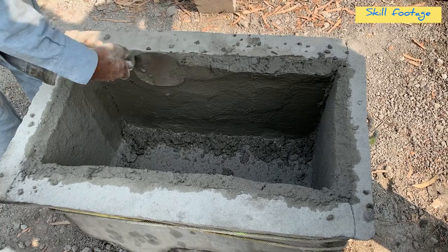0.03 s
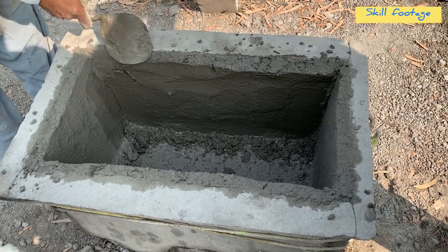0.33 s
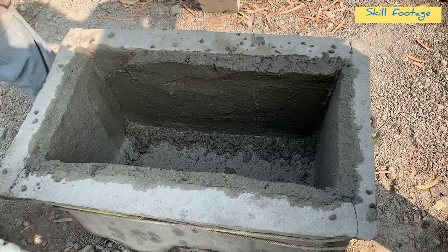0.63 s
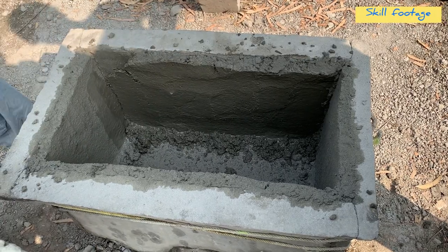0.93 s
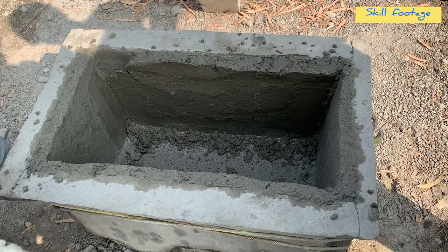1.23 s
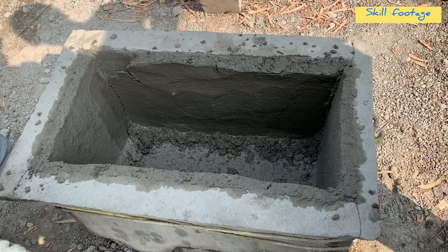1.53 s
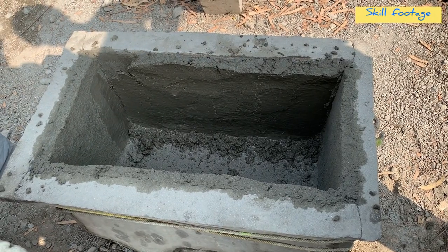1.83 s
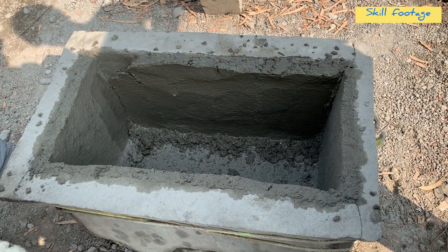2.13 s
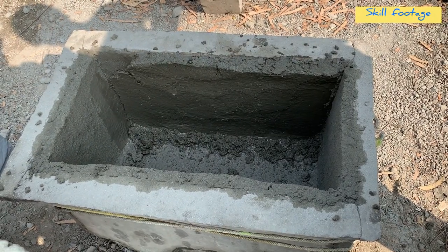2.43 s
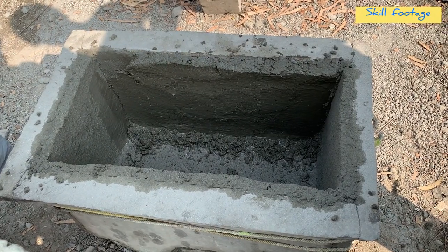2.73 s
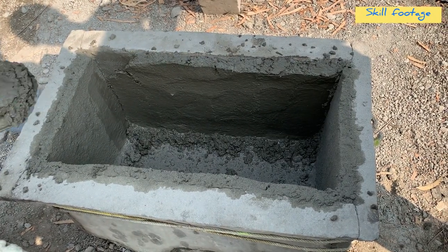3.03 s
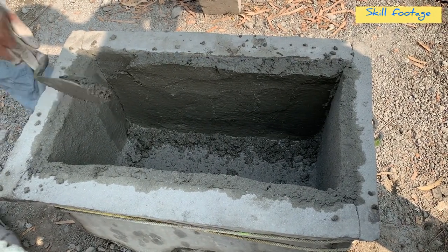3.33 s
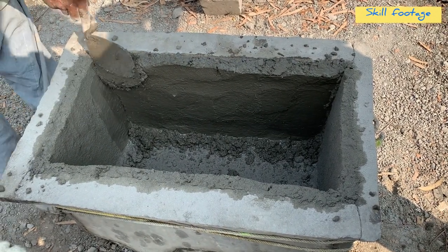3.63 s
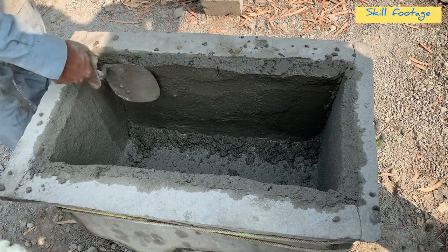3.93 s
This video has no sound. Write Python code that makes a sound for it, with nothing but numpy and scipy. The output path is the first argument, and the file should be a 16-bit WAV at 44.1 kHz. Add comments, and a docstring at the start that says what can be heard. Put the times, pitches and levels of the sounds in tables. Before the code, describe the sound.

Close up outdoors, a trowel works gritty mortar: a hissing stroke and a tap ahead, four hollow scoops to the left, then a wet slap and more smoothing. A sleeve rustles faintly and a far-off engine hums.

```python
"""Outdoors at a concrete pit, on a close pair of microphones; a distant engine hums under the air.
Straight ahead, a steel trowel hisses over the pit's wet lining, then taps the rim. A sleeve rustles.
Off to the left the blade digs four times into sandy mortar, a hollow resonating under it; the grains'
treble arrives slightly earlier on the right. The loaded blade lifts with a faint swish.
Ahead again, the load slaps onto the pit wall and is smoothed out."""
import sys
import numpy as np
from scipy import signal
from scipy.fft import rfft, irfft, next_fast_len
from scipy.io import wavfile
from scipy.ndimage import uniform_filter1d, map_coordinates

SR = 44100
rng = np.random.default_rng(int(sys.argv[2]) if len(sys.argv) > 2 else 0)


def to_wav(s):
    """Save 16-bit WAV."""
    ch = np.atleast_2d(s).T  # columns
    pcm = np.round(np.clip(ch, -1, 1) * 32767)  # PCM
    wavfile.write(sys.argv[1], SR, pcm.astype(np.int16))


N = 176400
TIME = np.arange(N) / SR


def amp(db):
    """Decibels to gain."""
    return 10 ** (np.asarray(db) / 20)


def unit(x):
    """Scale to rms 1."""
    return x / np.sqrt(np.mean(x ** 2) + 1e-20)


def along(points, hz):
    """Read (frequency [Hz], value) points on a log axis."""
    freqs, values = np.transpose(points)
    return np.interp(np.log(hz + 1), np.log(freqs + 1), values)


def stroke(rows):
    """Gain of one stroke, silent outside it."""
    times, db = np.transpose(rows)[:2]
    return amp(np.interp(TIME, times, db, left=-140, right=-140))


def wobble(rate):
    """A smooth random curve at rms 1, rate knots a second."""
    knots = rng.standard_normal(int(N * rate / SR) + 4)
    return unit(map_coordinates(knots, [TIME * rate]))


def filtered(x, response):
    """x times a complex response of frequency."""
    size = next_fast_len(N + SR // 2)
    return irfft(rfft(x, size) * response(np.fft.rfftfreq(size, 1 / SR)), size)[..., :N]


def coloured(x, spectrum):
    """x shaped by a spectrum, at rms 1."""
    return unit(filtered(x, lambda hz: amp(along(spectrum, hz))))


def burst(at, rise, fall):
    """Exponential swell to a peak, then exponential decay; all times in seconds."""
    return np.exp(np.minimum((TIME - at) / rise, (at - TIME) / fall))


def ring(at, hz, rise, fall):
    """One damped mode, struck softly."""
    return burst(at, rise, fall) * np.sin(2 * np.pi * hz * (TIME - at) + rng.uniform(0, 2 * np.pi))


def patchy(x, depth_db):
    """Random patches of colour that shift over time and frequency."""
    spectra = signal.stft(x, nperseg=512)[2]
    patches = uniform_filter1d(rng.standard_normal(spectra.shape[-2:]), size=3, axis=0)
    patches = uniform_filter1d(patches, size=6, axis=1)
    return signal.istft(spectra * amp(depth_db * unit(patches)), nperseg=512)[1][..., :N]


def sand(spectrum, per_s, size_spread_db, hiss, patchy_db):
    """Dense clicks of sand grains of uneven size over a fine hiss."""
    hits = rng.random(N) < per_s / SR
    grains = hits * rng.standard_normal(N) * amp(size_spread_db * rng.standard_normal(N))
    return coloured(patchy(unit(grains) + hiss * rng.standard_normal(N), patchy_db), spectrum)


def resonance(hz, width_hz):
    """Friction noise in one resonance, its centre steady or moving."""
    phase = 2 * np.pi * np.cumsum(np.broadcast_to(hz, N)) / SR
    a, b = filtered(rng.standard_normal((2, N)), lambda f: 1 / (1 + 1j * f / width_hz) ** 2)
    return unit(a * np.cos(phase) + b * np.sin(phase))


# reflections off the nearby concrete (frequency [Hz], level [dB])
REFLECTIONS = [(150, 2.5), (1000, -19), (2200, -5), (4500, 3), (8000, -22.5), (15000, -57)]
REFLECTION_DELAY_S, LEFT_LAG_S = .003, .000216


def placed(x, phase, balance):
    """A source at the two microphones, with diffuse reflections off the concrete."""
    def direct_path(hz):
        sides = np.array([[.5], [-.5]])
        left_lead = along(phase, hz) - 2 * np.pi * hz * LEFT_LAG_S
        return amp(along(balance, hz) * sides) * np.exp(1j * left_lead * sides)

    def reflected_path(hz):
        return amp(along(REFLECTIONS, hz)) * np.exp(-2j * np.pi * hz * REFLECTION_DELAY_S)

    spectra = signal.stft(x, nperseg=256)[2]
    random_phase = np.exp(2j * np.pi * rng.random((2, *spectra.shape)))
    diffuse = signal.istft(spectra * random_phase, nperseg=256)[1][:, :N]
    return filtered(x, direct_path) + np.sqrt(2) * filtered(diffuse, reflected_path)


# the wall at the microphones (frequency [Hz], left lead on top of the lag [rad])
WALL_PHASE = [(100, 0), (1100, 0.018), (2000, 1.38), (3300, 1.21), (5000, 1.1), (7000, .05), (15000, 0.087)]
# its balance (frequency [Hz], left minus right [dB])
WALL_BALANCE = [(200, 0), (1000, 10.5), (3000, -1), (8000, 0)]


def at_wall(x):
    """The pit wall lies ahead of the microphones."""
    return placed(x, WALL_PHASE, WALL_BALANCE)


# blade sliding on the wall, one curve per stroke (time [s], relative level [dB])
WALL_STROKES = [
    [(0.0, -41), (0.012, -48), (0.076, -41), (0.148, -43), (0.196, -50), (0.236, -77), (0.29, -92)],
    [(3.5, -54), (3.516, -64), (3.552, -46.5), (3.59, -52), (3.67, -34.5), (3.72, -68), (3.76, -78.5)],
    [(3.93, -93), (3.932, -91), (3.992, -42.5), (4.0, -50)],
]
# colour of each stroke (singing [dB], treble tilt [dB per octave])
STROKE_COLOURS = [(-3, -1), (-14, 3.5), (-14, -3)]
# grit in the wet lining (frequency [Hz], level [dB])
WALL_GRIT = [(150, -28.5), (600, -18), (2000, -7), (3300, -10), (4300, -7), (5500, -7), (7000, 0.5),
             (8600, 0.5), (10000, -1), (12000, 1), (14000, -4.5), (15500, -9.5)]
BLADE_HZ, BLADE_WIDTH_HZ = 8550, 320


def smoothing():
    """Pressed flat, the blade hisses over the wet lining and sings faintly."""
    grit = sand(WALL_GRIT, per_s=5000, size_spread_db=1.5, hiss=0.97, patchy_db=2)
    song = resonance(BLADE_HZ, BLADE_WIDTH_HZ)
    out = np.zeros(N)
    for rows, (sing_db, tilt_db) in zip(WALL_STROKES, STROKE_COLOURS):
        hiss = unit(filtered(grit, lambda hz: amp(tilt_db * np.log2(np.maximum(hz / BLADE_HZ, .5)))))
        out += stroke(rows) * unit(hiss + amp(sing_db) * song)
    return amp(3.5 + .6 * wobble(90)) * out


# open air around the pit (frequency [Hz], relative level [dB])
AIR_SPECTRUM = [(20, -11.5), (45, 3), (62, 5), (78, 7), (100, -2), (150, -7.5), (205, -7.5), (300, -18.5),
                (450, -19.5), (1000, -20.5), (2000, -29), (4000, -38.5), (7000, -50.5), (10000, -53),
                (15500, -67)]
# likeness of the air at the two microphones (frequency [Hz], correlation [-1 to 1])
AIR_LIKENESS = [(30, -0.059), (65, 0.32), (130, 0.93), (250, 0.31), (550, -0.02), (1650, -0.23),
                (5000, 0.22), (15000, -0.19)]
AIR_DB = -42


def open_air():
    """Steady air and rumble from all around, partly alike at the two microphones."""
    def mid_side_gains(hz):
        angle = np.arccos(np.clip(along(AIR_LIKENESS, hz), -1, 1)) / 2
        return np.array([np.cos(angle), np.sin(angle)])

    noise = patchy(rng.standard_normal((2, N)), depth_db=1.72)
    mid, side = filtered(noise, mid_side_gains)
    return amp(AIR_DB) * coloured(np.array([mid + side, mid - side]), AIR_SPECTRUM)


# hum arriving from far off (time [s], level [dB])
ENGINE_LEVEL = [(0.0, -35.5), (0.02, -39), (0.92, -41.5), (0.99, -50), (1.48, -34.5), (1.82, -48),
                (1.85, -37), (2.08, -59), (2.1, -42.5), (2.72, -36), (2.87, -45), (3.05, -35.5),
                (3.15, -45), (3.68, -40), (3.73, -55), (4.0, -39)]
ENGINE_HZ = 64.85


def engine():
    """A distant engine: one low tone that wavers in pitch and level."""
    shaft = 2 * np.pi * np.cumsum(ENGINE_HZ + 0.79 * wobble(7.02)) / SR
    level = amp(np.interp(TIME, *np.transpose(ENGINE_LEVEL)))
    microphone_phase = np.array([[-.12], [.12]])
    return level * np.sqrt(2) * np.sin(shaft + microphone_phase)


# blade contacts (time [s], tick level [dB], rise [s], fall [s], thud level [dB])
KNOCKS = [(.372, -33, 0.011, 0.0133, -40.5), (0.647, -60.5, 0.012, 0.016, -64),
          (0.713, -63, 0.0044, 0.013, -55), (.9445, -22, 0.0032, 0.0043, -57),
          (1.274, -44.5, .005, 0.0093, -45.5), (1.888, -27, 0.0053, .012, -44.5)]
# the bright tick (frequency [Hz], level [dB])
TICK_SPECTRUM = [(150, -14), (500, -12), (2500, -24), (5000, -16.5), (7000, 1), (9000, 2), (11500, 0.5),
                 (15500, -7.5)]
# the duller clack (frequency [Hz], level [dB])
CLACK_SPECTRUM = [(150, -4), (500, -6.5), (1000, -6.5), (1800, 7.5), (2800, -8.5), (4200, -5.5),
                  (7000, -32), (15500, -31)]
# dull ring of trowel and concrete (frequency [Hz], level against the thud [dB], fall [s])
RIM_MODES = [(180, 1, 0.022), (499, -9.5, 0.01), (1108, -5.5, 0.031), (2280, -14.5, 0.0102)]


def knocks():
    """The blade meets concrete or a pebble: a gritty tick, a duller clack and a short ring."""
    tick = sand(TICK_SPECTRUM, per_s=4400, size_spread_db=1.5, hiss=1, patchy_db=0)
    clack = sand(CLACK_SPECTRUM, per_s=2500, size_spread_db=3, hiss=.7, patchy_db=4)
    out = np.zeros(N)
    for at, tick_db, rise, fall, thud_db in KNOCKS:
        out += amp(tick_db) * burst(at, rise, fall) * tick
        out += amp(thud_db - 1) * burst(at + 0.0073, rise, fall=0.015) * clack
        out += sum(amp(thud_db + db) * ring(at, hz, rise, decay) for hz, db, decay in RIM_MODES)
    return out


# swings of the arm (time [s], rustle level [dB], width [s], sliding hiss level [dB])
RUSTLES = [(.74, -65, 0.07, -73), (.85, -55.5, 0.047, -66), (2.42, -65.5, .05, -70),
           (3.021, -58, 0.055, -66.5), (3.2, -68, 0.05, -77)]
# rustling cloth (frequency [Hz], level [dB])
CLOTH_SPECTRUM = [(300, -19), (1500, 1), (3000, -1), (4800, 3), (6500, -8.5), (9500, -7.5), (11000, -22.5),
                  (15500, -23)]
SLIDE_HZ = 4740


def sleeve():
    """The sleeve rustles in soft, wide swells, with a narrow hiss in the centre where cloth slides."""
    rustle, slide = np.zeros((2, N))
    for at, rustle_db, width, slide_db in RUSTLES:
        swell = np.exp(-.5 * ((TIME - at) / width) ** 2)
        rustle += amp(rustle_db) * swell
        slide += amp(slide_db) * swell
    cloth = rustle * coloured(rng.standard_normal((2, N)), CLOTH_SPECTRUM)
    hiss = slide * resonance(SLIDE_HZ, width_hz=900)
    return amp(0.76 * wobble(40)) * (cloth + hiss)


# the heap at the microphones (frequency [Hz], left lead on top of the lag [rad])
HEAP_PHASE = [(100, 0.5), (400, 3), (860, 2.5), (1210, 3.5), (1600, 5), (2500, 9), (3800, 13.5),
              (5000, 13.5), (7000, 12.5), (15000, 12.5)]
# its balance (frequency [Hz], left minus right [dB])
HEAP_BALANCE = [(200, 15), (700, 15), (1300, 5), (2400, 6.5), (4400, 6), (8100, -2), (15000, 1)]


def at_heap(x):
    """The heap lies off to the left of the microphones."""
    return placed(x, HEAP_PHASE, HEAP_BALANCE)


# blade in the heap, one curve per push (time [s], relative level [dB])
HEAP_PUSHES = [
    [(0.89, -74), (0.932, -46), (0.944, -38.5), (0.958, -45), (1.0, -34), (1.088, -53.5), (1.144, -43),
     (1.206, -54), (1.23, -65)],
    [(1.23, -65.5), (1.276, -33.5), (1.304, -41.5), (1.354, -47), (1.428, -47), (1.454, -39),
     (1.504, -36.5), (1.54, -57.5)],
    [(1.54, -62), (1.562, -50), (1.676, -57.5), (1.712, -40.5), (1.722, -40), (1.81, -88)],
    [(1.82, -87), (1.884, -33.5), (1.9, -33), (1.914, -44), (1.974, -40), (2.004, -50.5), (2.022, -48),
     (2.09, -74)],
    [(2.09, -74), (2.138, -43), (2.222, -35.5), (2.262, -41.5), (2.33, -38.5), (2.364, -59.5), (2.41, -71)],
    [(2.41, -71), (2.448, -59), (2.478, -61.5), (2.504, -56.5), (2.518, -56.5), (2.566, -82.5), (2.58, -83)],
]
# sandy mortar on steel (frequency [Hz], level [dB])
HEAP_GRIT = [(150, -14), (450, -9), (800, -7.5), (1500, 0.5), (2300, -3.5), (3500, 0), (5000, -3.5),
             (6500, -2.5), (8000, 3), (9300, 5), (11000, 4.5), (13000, -3), (15500, -3)]


def digging():
    """Sand grinds along the blade as it cuts into the heap."""
    force = np.max([stroke(rows) for rows in HEAP_PUSHES], axis=0)
    grit = sand(HEAP_GRIT, per_s=3500, size_spread_db=1, hiss=0.93, patchy_db=3)
    return amp(3.5 + 0.48 * wobble(110)) * force * grit


# hollow under the blade, one curve per dig (time [s], relative level [dB], pitch [Hz])
HOLLOWS = [
    [(.92, -56, 1050), (.945, -43.5, 1037), (.98, -42, 1033), (1.01, -33, 1020), (1.05, -43.5, 995),
     (1.09, -44, 1021), (1.13, -42.5, 1043), (1.21, -55.5, 956)],
    [(1.25, -60, 1150), (1.28, -50, 1100), (1.35, -41, 1020), (1.42, -41.5, 894), (1.47, -40, 817.5),
     (1.505, -38.5, 735), (1.54, -54, 764), (1.565, -48, 756), (1.6, -72, 740)],
    [(1.87, -82, 801), (1.89, -40, 803), (1.92, -52.5, 803), (1.96, -46.5, 776), (2.03, -65.5, 782)],
    [(2.13, -52, 1100), (2.19, -50, 1047), (2.24, -38, 929), (2.285, -33.5, 859), (2.31, -43.5, 934),
     (2.335, -47, 990), (2.36, -62, 1000)],
]
# its resonances (frequency [multiple of pitch], relative width [ratio], level [dB])
HOLLOW_MODES = [(.8, 0.14, -11), (1, 0.11, 1.5), (1.85, .18, -9.5)]
# per dig (factor on those widths [ratio])
HOLLOW_SPREAD = [0.7, 0.62, 2.1, 1.3]
# steady resonances around the heap (frequency [Hz], width [Hz], level [dB])
HEAP_MODES = [(509, 32, -13.5), (1040, 50, -7), (1427, 130, -16.5)]


def hollows():
    """The scrape resonates in the gap under the blade, lower as it widens, and around the heap."""
    steady = sum(amp(db) * resonance(hz, width) for hz, width, db in HEAP_MODES)
    out = np.zeros(N)
    for rows, spread in zip(HOLLOWS, HOLLOW_SPREAD):
        times, _, hz = np.transpose(rows)
        pitch = np.interp(TIME, times, hz)
        gap = sum(amp(db) * resonance(ratio * pitch, ratio * hz.mean() * width * spread)
                  for ratio, width, db in HOLLOW_MODES)
        out += stroke(rows) * (steady + gap)
    return amp(-3) * out


# the loaded blade rising, one curve per lift (time [s], level [dB], pitch [Hz])
SWISHES = [
    [(1.78, -73, 3230), (1.82, -63, 2750), (1.85, -71, 2500)],
    [(2.55, -82, 6200), (2.61, -55.5, 4720), (2.66, -61, 3200), (2.70, -68.5, 2600), (2.76, -66.5, 2144),
     (2.8, -72, 1900)],
]


def swishes():
    """As the blade lifts, a thin, uneven hiss slides down in pitch, diffuse across the microphones."""
    out = np.zeros((2, N))
    for rows in SWISHES:
        times, _, hz = np.transpose(rows)
        pitch = np.interp(TIME, times, hz)
        out += stroke(rows) * np.array([resonance(pitch, width_hz=420) for _ in range(2)])
    return amp(2 * wobble(45)) * out


# wet mortar spattering on the wall (frequency [Hz], level [dB])
SPATTER_SPECTRUM = [(150, -4.5), (400, -2.5), (1200, -0.5), (2500, -1.5), (5000, -12), (8000, 2),
                    (10000, -3.5), (12000, -1), (15500, -10)]
# the pit ringing under the slap (frequency [Hz], level [dB], fall [s])
PIT_MODES = [(600, -28.5, 0.0048), (965, -28.5, 0.0025), (1047, -21, 0.0042), (1375, -29, 0.0076),
             (1880, -35, 0.0061), (2060, -37.5, 0.0089), (2540, -41, 0.004), (3700, -36, 0.0056),
             (4170, -34, 0.0054)]
SLAP_S, SLAP_RISE_S = 3.4432, 0.0025
THUMP_HZ, THUMP_DB, THUMP_LAG_S = 197, -29.5, .012


def slap():
    """The load lands: a wet spatter, a hollow pop in the pit, then the thump of its weight."""
    splash = amp(-25) * burst(SLAP_S, rise=0.007, fall=0.0051)
    tail = amp(-35.5) * burst(SLAP_S, rise=0.015, fall=0.026)
    spatter = sand(SPATTER_SPECTRUM, per_s=2600, size_spread_db=-0.5, hiss=1.3, patchy_db=1.5)
    pop = sum(amp(db) * ring(SLAP_S, hz, SLAP_RISE_S, fall) for hz, db, fall in PIT_MODES)
    thump = amp(THUMP_DB) * ring(SLAP_S + THUMP_LAG_S, THUMP_HZ, rise=0.0063, fall=0.008)
    return (splash + tail) * spatter + pop + thump


def scene():
    """The wall ahead, the heap to the left, the engine far off in the open air."""
    wall = at_wall(smoothing() + knocks() + slap())
    heap = at_heap(digging() + hollows())
    return wall + open_air() + engine() + sleeve() + heap + swishes()


TOP_HZ, EDGE_HZ = 15850, 300


def record(dry):
    """The recorder keeps nothing above its band limit."""
    return filtered(dry, lambda hz: np.clip((TOP_HZ - hz) / EDGE_HZ + .5, 0, 1))


dry = scene()
out = record(dry)
to_wav(out)
```